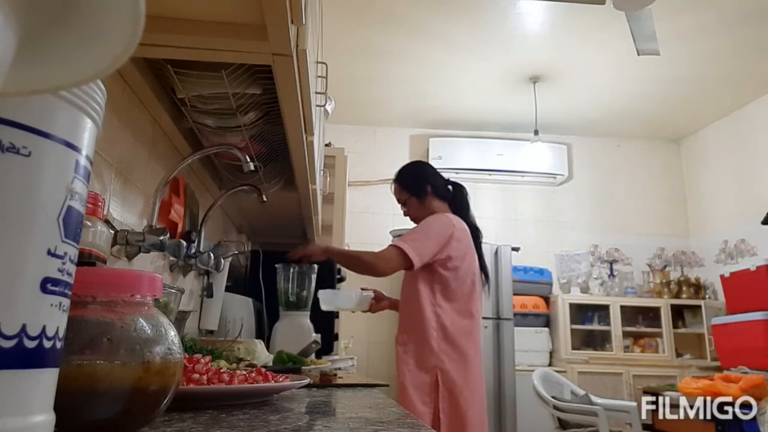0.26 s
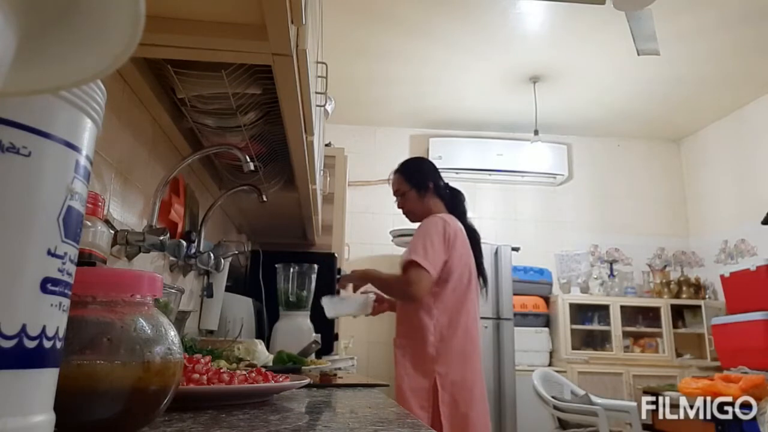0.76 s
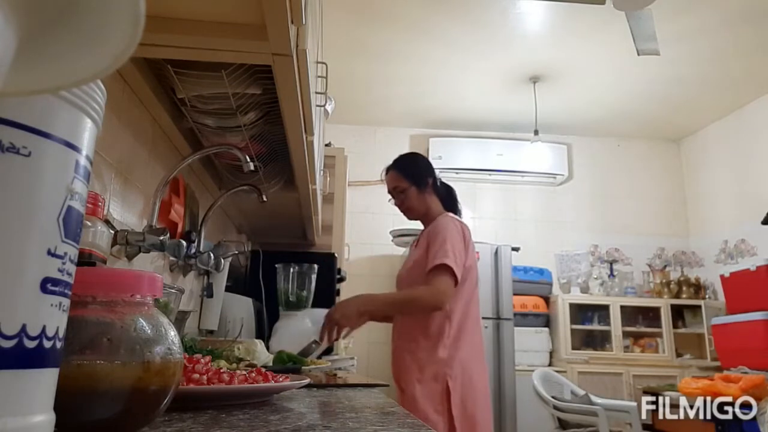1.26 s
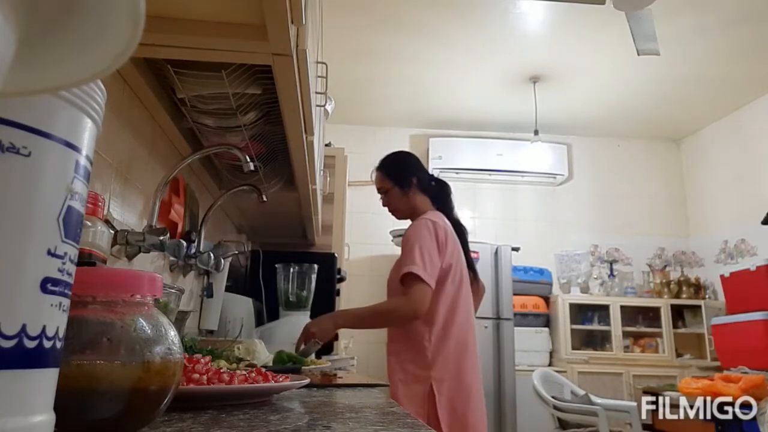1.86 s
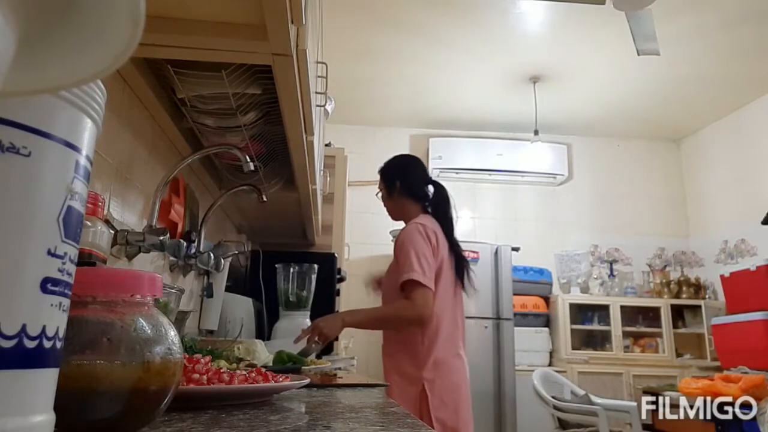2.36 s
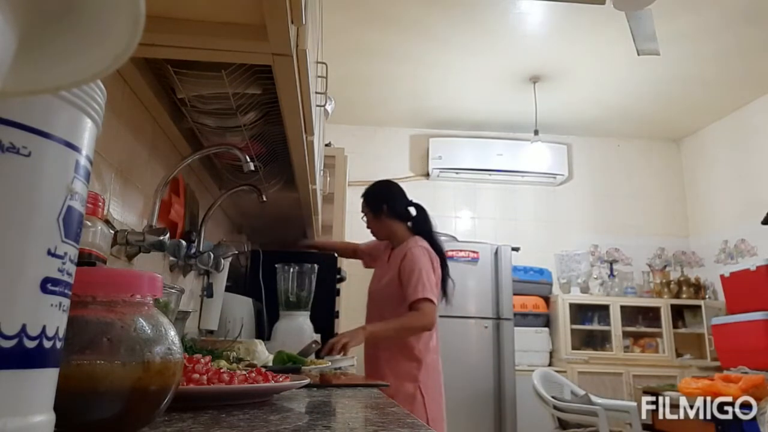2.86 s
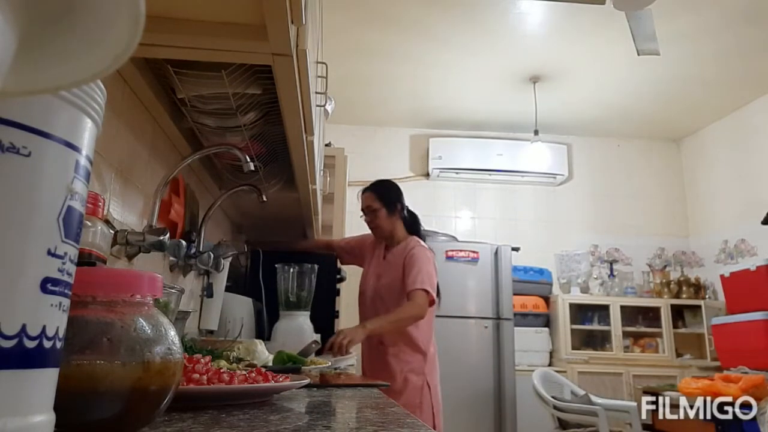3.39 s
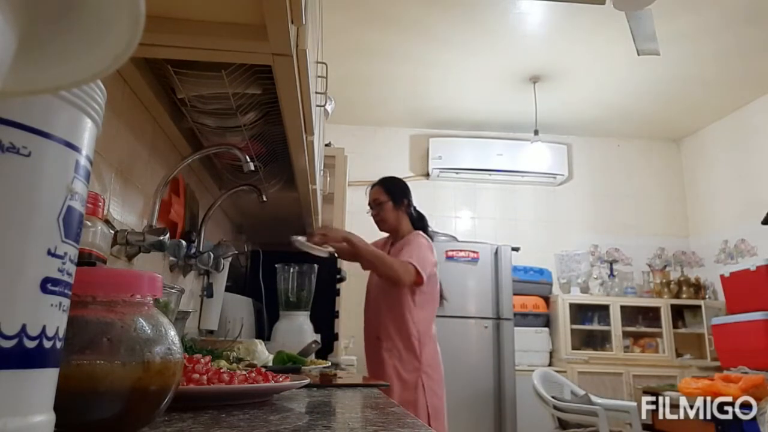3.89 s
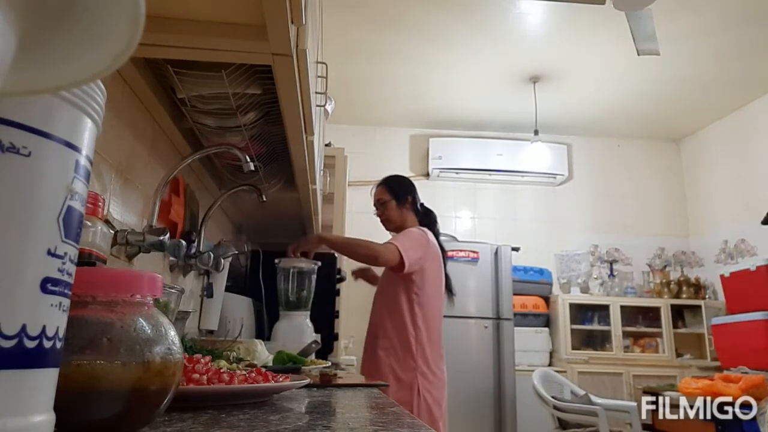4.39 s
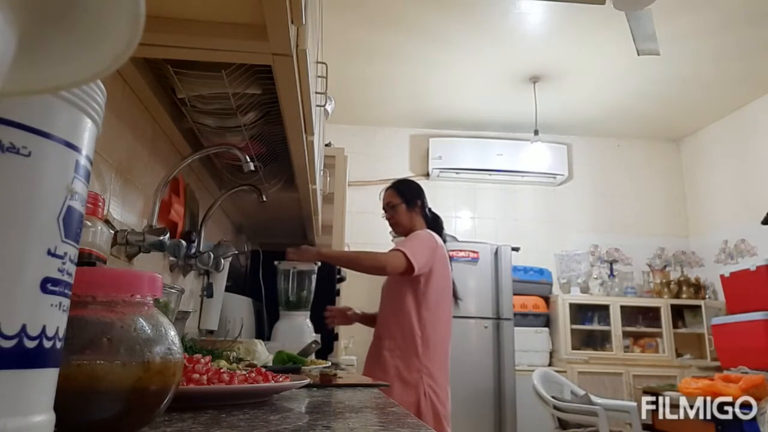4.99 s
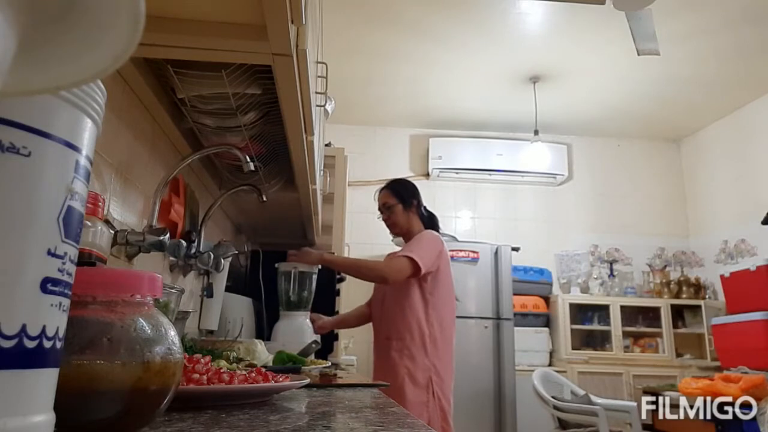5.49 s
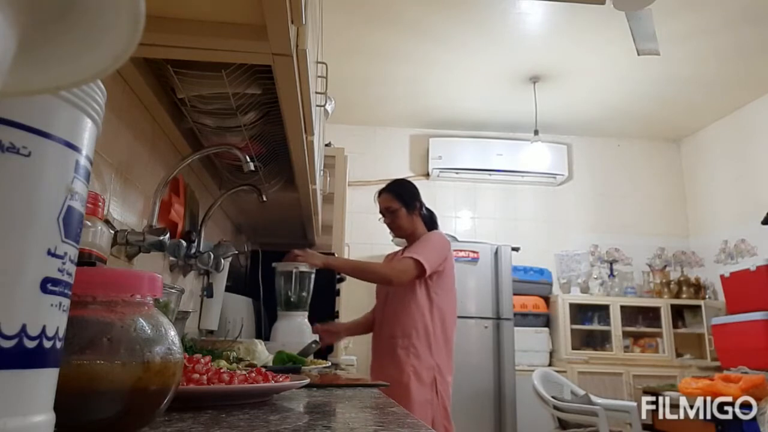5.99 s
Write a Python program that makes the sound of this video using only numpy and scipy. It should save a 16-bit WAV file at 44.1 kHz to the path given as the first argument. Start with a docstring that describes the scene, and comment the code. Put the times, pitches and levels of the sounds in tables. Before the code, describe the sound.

In a humming, echoing kitchen, a hollow plastic tub thuds and clatters on the counter, then a sharp snap, a lid clink and soft jar nudges.

```python
"""Fans run steadily in a hard-walled kitchen; then a plastic tub is knocked about on the counter and a cupboard.
Something snaps sharply, a lid clinks onto a blender jar, the jar is pressed and nudged on its base, and
something wooden is tapped. The blender motor stays off. Blows are noise bursts and ringing modes, the fans,
brushing and dragging are shaped noise. The two microphone ports hear every blow mostly through the room's echo."""
import sys
import numpy as np
from scipy import signal
from scipy.fft import rfft, irfft
from scipy.io import wavfile
from scipy.ndimage import uniform_filter1d

SR = 44100
rng = np.random.default_rng(int(sys.argv[2]) if len(sys.argv) > 2 else 0)


def to_wav(sig):
    """Store sig (one row per channel, or 1-D mono) as 16-bit WAV at the path in sys.argv[1].

    Samples outside -1..1 are clipped; the rate is SR.
    """
    pcm = np.clip(np.atleast_2d(sig), -1, 1) * 32767
    pcm = np.round(pcm).astype(np.int16)
    wavfile.write(sys.argv[1], SR, pcm.T)  # frames by channels


N = 275625  # samples, 6.25 s

# Fan noise spectrum. Each row: frequency [Hz], relative density [dB per Hz].
FAN_SPECTRUM = [(15, -53), (25, -36), (64, -1), (137, -2.5), (161, -14), (217, -14), (249, -15), (317, -10),
                (796, -15.5), (887, -22.5), (1160, -21.5), (3920, -43), (5430, -36), (6380, -49),
                (16000, -58.5)]
# Room resonances in the fan noise. Each row: frequency [Hz], width [Hz], lift before it is halved [dB].
AIR_RESONANCES = [(76, 4.6, 7), (120, 29.4, 1), (321.4, 33, 8.5), (395, 50, 6.5), (2320, 1000, 10.5),
                  (5400, 500, 6)]
FANS_DB, WAVER_DB = -43, 0.7   # fan level; spread of its slow wavering
# The fan blades sweep the lowest hum: rate, swing either way, time of a maximum.
THROB_HZ, THROB_DB, THROB_AT_S = 3.3, 3.5, 0.285

# How alike steady noise is at the two ports. Each row: frequency [Hz], likeness from -1 to 1 [no unit].
STEADY_LIKENESS = [(60, 1), (130, 0.94), (290, 0.92), (640, 0.51), (1410, -0.18), (3100, 0.15), (6820, 0.5),
                   (15000, 1)]
# How steady noise leans. Each row: frequency [Hz], left minus right [dB].
STEADY_LEAN = [(60, 0.5), (100, 2), (180, 3.5), (310, 0.5), (550, 5.5), (950, 4.5), (1650, 6.5),
               (2860, 6.5), (4970, 14), (8640, 2), (15000, -4.5)]
# How alike echoes are at the two ports. Each row: frequency [Hz], likeness from -1 to 1 [no unit].
ECHO_LIKENESS = [(60, 0.72), (130, 0.95), (290, 0.93), (640, 0.53), (1410, -0.42), (3100, -0.15),
                 (6820, 0.32), (15000, 1)]
# How echoes lean. Each row: frequency [Hz], left minus right [dB].
ECHO_LEAN = [(60, -6), (100, 7.5), (180, 0.5), (310, 0.5), (550, 3.5), (950, 0), (1650, 8.5), (2860, 1),
             (4970, 10), (8640, -1.5), (15000, -1)]
# Decay of the kitchen's echo. Each row: frequency [Hz], time to fall 60 dB [s].
ROOM_T60 = [(60, 0.4), (160, 0.49), (420, 0.45), (1100, 0.42), (2910, 0.46), (7680, 0.36)]
# Response of the microphone ports. Each row: frequency [Hz], gain [dB].
MIC_RESPONSE = [(300, 0), (1000, -2.5), (2500, 0.2), (3900, 4), (4600, -1), (5400, 0.2), (6200, -6),
                (7600, -3.5), (9500, -9), (12500, -8.5), (16000, -14)]
CUTOFF_HZ = 15800

# Cloth and hands brushing. Each row: time of peak [s], peak level [dB], rise [s], fall [s].
BRUSH_STROKES = [(.268, -66.5, .13, .19), (.63, -63, .1, .2), (.77, -65, .12, .2), (1.044, -73, 0.074, .2),
                 (1.53, -62, 0.062, 0.18), (2.1, -58, .1, .15), (4.45, -68, .02, 0.27),
                 (4.616, -55.5, 0.12, 0.16), (4.876, -59.5, .15, .09), (5.3, -54, .01, .03),
                 (5.506, -64, .3, 0.1), (5.605, -50, 0.0081, 0.084)]
# Brushing spectrum. Each row: frequency [Hz], relative density [dB per Hz].
BRUSH_SPECTRUM = [(1500, -5), (3000, 12), (5500, 6.5), (7500, 1.5), (16000, -14)]
BRUSH_SWING_DB = 17.5   # gained over the rise, lost over the fall
# Things dragged over the counter. Each row: time of stop [s], length [s], body level [dB], hiss level [dB],
# swell over the length, at least 3 in use [dB].
DRAGS = [(2.857, 0.071, -32.5, -40, 22), (2.938, .07, -27, -35, 14), (3.0, .06, -30, -35, 3),
         (5.148, 0.02, -35, -41, 37), (5.67, 0.058, -44.5, -47, 10)]
SLIDE_STOP_S = 0.013   # time to lose the swell again

# Blows, one table a thing. Each row: start [s], knock [dB], hollow body [dB], snap [dB], thump [dB], thump
# pitch [Hz]; all levels are relative.
TUB_BLOWS = [(1.783, -22.5, -22, -35, -38, 143), (1.796, -21, -17, -37, -21.5, 169),
             (1.891, -29.5, -36, -42, -31.5, 91), (2.002, -29.5, -23, -40, -37, 172),
             (2.202, -21.5, -29.5, -23, -10, 168), (2.213, -12, -10, -19, -7, 109.4),
             (2.254, -23, -18.5, -30, -13, 100.5), (2.412, -23, -17.5, -26, -18, 162),
             (2.433, -21, -19, -34, -10.5, 118), (2.468, -54, -35, -43, -29, 106),
             (2.86, -44, -31.5, -40, -22, 101), (2.903, -37, -33.5, -55, -22, 122),
             (2.936, -23, -13.5, -28, -15, 99), (2.965, -24, -40, -32, -20, 84.5),
             (2.987, -26, -19, -34, -12.5, 144), (3.028, -32, -39, -38, -21.5, 174.3),
             (3.289, -36, -32, -46, -24, 101), (3.379, -56, -56, -46, -64, 106)]
# The sharp snap. Each row: columns as for the tub [s, dB, dB, dB, dB, Hz].
SNAP_BLOWS = [(3.452, -28.5, -44.5, -15, -35, 120)]
# The lid clinking on. Each row: columns as for the tub [s, dB, dB, dB, dB, Hz].
LID_BLOWS = [(4.143, -28, -39, -32.5, -31, 120), (4.182, -37.5, -34.5, -49, -50, 120)]
# The jar pressed and nudged. Each row: columns as for the tub [s, dB, dB, dB, dB, Hz].
JAR_BLOWS = [(4.101, -36, -49, -45.5, -52, 120), (4.39, -45, -36, -45.5, -33, 146.5),
             (4.432, -44.5, -43, -44, -39, 108), (5.081, -53, -52, -57, -54, 140),
             (5.156, -36, -36, -24, -34, 126), (5.162, -40, -26, -36, -17, 122),
             (5.197, -39, -28, -62, -25, 117), (5.256, -46, -29.5, -60, -28, 117),
             (5.295, -45, -44, -58, -29, 138), (5.67, -49, -61, -38, -32, 126),
             (5.68, -47, -30, -55, -47, 120)]
# The wooden taps. Each row: columns as for the tub [s, dB, dB, dB, dB, Hz].
TAP_BLOWS = [(6.023, -46, -36.5, -42.5, -39, 120), (6.061, -48, -46, -51, -47, 120),
             (6.166, -43, -51, -67, -49, 120)]

# What rings in the counter. Each row: frequency [Hz], relative level [dB], time to fall 60 dB [s].
COUNTER_MODES = [(92.2, -11.5, 0.48), (120, -7.5, 0.17)]
# What rings in the plastic tub. Each row: frequency [Hz], relative level [dB], time to fall 60 dB [s].
TUB_MODES = [(313, 3, 0.033), (388, -8, 0.05), (594, 5.5, 0.049), (646, -18, 0.12), (768, -1, 0.061),
             (1189.5, -1, 0.04), (1520, 2.5, 0.015), (1997, 9.5, 0.02)]
# What rings in the lid. Each row: frequency [Hz], relative level [dB], time to fall 60 dB [s].
LID_MODES = [(374, 5, 0.42), (588, -7.5, 0.3), (957, 9, 1.0), (962, 1, 1.0), (1070, 7, 0.22),
             (1117, -5, 0.16), (1650, 6.5, 0.16), (2000, 2.5, 0.22), (2590, 2, 0.24), (3890, -1, 0.12)]
# What rings in the jar and in the snap. Each row: frequency [Hz], relative level [dB], time to fall 60 dB [s].
JAR_MODES = [(635, -23, 0.051), (1101, 3, 0.09), (2030, 0.5, 0.037), (3670, 11.5, 0.025)]
# What rings in the tapped wood. Each row: frequency [Hz], relative level [dB], time to fall 60 dB [s].
TAP_MODES = [(507, 5, 0.12), (680, -13, 0.049)]

# Centres of the contact's bands in one list: body, knock, crack, snap, sizzle [Hz].
CONTACT_HZ = [420, 1200, 3000, 6000, 11000]
# How each thing makes contact. Each row, by thing: decay time when snap equals knock [ms], ringing [dB],
# crack against the mean of knock and snap [dB], sizzle against snap [dB],
# spread of each mode's strength from blow to blow [dB].
CONTACT = {"tub": (4.6, -23.5, -6, -5.5, 1.8), "snap": (1.3, -44, -7, -2.5, 6),
           "lid": (3.0, -10.5, -4.5, -21.5, 0.8), "jar": (3.5, -18.5, -1.5, -9, 1.5),
           "tap": (2.5, -15, -10.5, -15, 1.5)}
HARDNESS = 0.26   # brighter blows are shorter: dB of contact length lost per dB of snap over knock


def amp(db):
    """Decibels to a linear gain."""
    return 10 ** (np.asarray(db) / 20)


def unit_energy(x):
    """Scale to a summed square of 1."""
    return x / np.sqrt(np.sum(x ** 2) + 1e-20)


def at_hz(points, hz):
    """Read a table on a log-frequency axis."""
    table = np.array(points)
    return np.interp(np.log(hz + 0.0011), np.log(table[:, 0]), table[:, 1])


def band(x, low_hz, high_hz):
    """Keep the sound between two frequencies."""
    return signal.sosfilt(signal.butter(2, [low_hz, high_hz], "band", fs=SR, output="sos"), x)


def drift(rate_hz):
    """Slow chance, spread 1: noise smoothed by two equal poles, drawn every 40 samples."""
    r = np.exp(-80 * np.pi * rate_hz / SR)
    chance = rng.standard_normal(N // 40 + 2002)
    slow = signal.lfilter([1], [1, -2 * r, r * r], chance)[2000:]   # the start has settled
    return np.interp(np.arange(N) / 40, np.arange(len(slow)), slow / slow.std())


def swell(peak_s, peak_db, rise_s, fall_s, swing_db):
    """Gain that climbs evenly in dB to its peak and falls again; silent before the rise."""
    since = np.arange(N) / SR - peak_s
    away = np.where(since < 0, -since / max(rise_s, .002), since / max(fall_s, .002))
    return amp(peak_db - swing_db * away) * (since > -rise_s)


def stereo_noise(size, colour, likeness, lean):
    """Diffuse noise at the two ports: likeness and lean vary with frequency; overall rms 1."""
    hz = np.fft.rfftfreq(size, 1 / SR)
    mid, side = rfft(rng.standard_normal((2, size)))
    alike = np.clip(at_hz(likeness, hz), -1, 1)
    sign = np.array([[1], [-1]])
    pair = np.sqrt(1 + alike) * mid + np.sqrt(1 - alike) * side * sign
    out = irfft(pair * colour(hz) * amp(sign * at_hz(lean, hz) / 2), size)
    return out / out.std()


def fans():
    """Steady air noise coloured by room resonances; its bass throbs with the blades."""
    def colour(hz):
        humps = 0
        for top_hz, width_hz, lift_db in AIR_RESONANCES:
            humps = humps + (amp(lift_db) - 1) / (1 + (2 * (hz - top_hz) / width_hz) ** 2)
        return amp(at_hz(FAN_SPECTRUM, hz)) * (1 + .5 * humps)

    air = stereo_noise(N, colour, STEADY_LIKENESS, STEADY_LEAN)
    hum = band(air, 53, 96)
    sweep = np.cos(2 * np.pi * THROB_HZ * (np.arange(N) / SR - THROB_AT_S))
    throb = hum * (amp(THROB_DB * sweep) - 1)
    return amp(FANS_DB) * (air * amp(WAVER_DB * drift(1.4)) + throb)


def kitchen(x, direct_db, early_db):
    """The direct sound, strong echoes off near tiles, then a tail that dies octave by octave."""
    t = np.arange(2 ** 15) / SR
    noise = stereo_noise(len(t), np.ones_like, ECHO_LIKENESS, ECHO_LEAN)
    echo = 0
    for low in 60 * 2. ** np.arange(8):
        high = 2 * low if low < 7000 else 18000
        decay = amp(-60 * t / at_hz(ROOM_T60, 1.26 * low))
        echo = echo + band(noise, low, high) * decay
    onset = 1 - np.exp(-t / 0.0013)
    near_tiles = 1 + amp(early_db) * np.exp(-t / 0.0049)
    echo = unit_energy(echo * onset * near_tiles) * np.sqrt(2)
    # the sources stand to the left: louder there, five samples later on the right
    echo[0, 0] += amp(direct_db + 6.0)
    echo[1, 5] += amp(direct_db - 2.0)
    return signal.fftconvolve(x[None], echo, axes=1)[:, :N]


def microphone_ports(x):
    """The microphone ports lift the presence range."""
    return irfft(rfft(x) * amp(at_hz(MIC_RESPONSE, np.fft.rfftfreq(N, 1 / SR))), N)


def brushing():
    """Cloth and hands: faint bright friction, patchy, each stroke swelling and fading."""
    hiss = stereo_noise(N, lambda hz: amp(at_hz(BRUSH_SPECTRUM, hz)), STEADY_LIKENESS, STEADY_LEAN)
    strokes = sum(swell(*row, BRUSH_SWING_DB) for row in BRUSH_STROKES)
    return strokes * amp(1.0 * drift(25)) * hiss


def slides():
    """Dragging over the counter: a rumbling body and a hiss, both uneven, louder until they stop."""
    def colour(hz):
        return amp(at_hz(MIC_RESPONSE, hz)) / np.sqrt(hz + 300)

    rub = stereo_noise(N, colour, ECHO_LIKENESS, ECHO_LEAN)
    body, hiss = band(rub, 270, 1680), band(rub, 2350, 21000)
    out = 0
    for stop_s, length_s, body_db, hiss_db, swell_db in DRAGS:
        sound = amp(body_db) * body / body.std() + amp(hiss_db) * hiss / hiss.std()
        out = out + swell(stop_s, 0, length_s, SLIDE_STOP_S, max(swell_db, 3)) * sound
    return amp(1.6 * drift(50)) * out


def ring(force, modes):
    """A force sets every mode of a body ringing: one damped resonator a mode."""
    out = 0
    for hz, level_db, t60 in modes:
        r = amp(-60 / (max(t60, .01) * SR))
        w = 2 * np.pi * hz / SR
        poles = [1, -2 * r * np.cos(w), r * r]
        out = out + signal.lfilter([0, amp(level_db) * np.sin(w)], poles, force + 1e-18)
    return out


def counter_thump(t, thump_hz):
    """A soft push sets the counter's panels ringing; the deepest bass is cut away steeply."""
    push = np.exp(-t / 0.0004) * t
    panel = ring(push, COUNTER_MODES + [(thump_hz, 2.5, .13)])
    panel = signal.sosfilt(signal.butter(4, 70, "high", fs=SR, output="sos"), panel)
    return panel / np.abs(panel).max()


def blows(events, modes, contact):
    """Each blow: a soft push into the counter, a gritty contact, and the ringing of the struck body."""
    thump, knock, rung = np.zeros((3, N + SR))
    size, lead = 32768, 128   # samples
    t, hz = np.arange(size) / SR, np.fft.rfftfreq(size, 1 / SR)
    late = np.exp(-2j * np.pi * hz * lead / SR)   # room for the rise of the contact
    impulse = 1. * (t == 0)
    partials = np.array([ring(impulse, [mode]) for mode in modes]) * (t < size / SR / 2 - .01)
    partials = rfft(partials / np.sqrt(np.sum(partials.sum(axis=0) ** 2)))
    length_ms, ring_db, crack_db, sizzle_db, spread_db = contact
    for start_s, knock_db, body_db, snap_db, thump_db, thump_hz in events:
        contact_ms = np.clip(length_ms * amp(-HARDNESS * (snap_db - knock_db)), .3, 12)
        through = 1000 * t / contact_ms
        body = amp(spread_db * rng.standard_normal(len(modes))) @ partials
        envelope = np.exp(-through) * (1 - np.exp(-7 * through))   # long contacts start softly
        grit = rfft(rng.standard_normal(size) * envelope)
        grit = grit / np.sqrt(uniform_filter1d(np.abs(grit) ** 2, size=50))   # grit has no colour of its own

        crack_level = (knock_db + snap_db) / 2 + crack_db
        levels = [body_db, knock_db, crack_level, snap_db, snap_db + sizzle_db]
        points = [(60, body_db - 25), (170, body_db - 6.5), *zip(CONTACT_HZ, levels)]
        # band level spread over its width
        colour = amp(at_hz(points, hz) + 28.5) * np.sqrt(SR / 2 / (hz + 50)) * late

        start = round(start_s * SR)
        at = start - lead
        knock[at:at + size // 8] += irfft(grit * colour)[:size // 8]
        rung[at:at + size // 2] += amp(ring_db) * irfft(body * colour)[:size // 2]
        thump[start:start + size // 2] += amp(thump_db) * counter_thump(t[:size // 2], thump_hz)
    return thump[:N], knock[:N], rung[:N]


def struck(events, modes, contact, direct_db, early_db, left_db):
    """Blows and their echo at the ports; the lean raises the left and lowers the right by left_db."""
    thump, knock, rung = blows(events, modes, contact)
    into_room = microphone_ports(knock) + amp(-12.0) * thump + amp(2.0) * rung
    heard = kitchen(into_room, direct_db, early_db)
    return thump * amp([[.9], [-.9]]) + (heard + rung) * amp([[left_db], [-left_db]])


def wooden_tap():
    """Something wooden is tapped: short contacts and two modes."""
    return struck(TAP_BLOWS, TAP_MODES, CONTACT["tap"], direct_db=-8, early_db=3, left_db=.3)


def snap():
    """A sharp snap: a very short, bright contact with hardly any ringing."""
    return struck(SNAP_BLOWS, JAR_MODES, CONTACT["snap"], direct_db=-9, early_db=3, left_db=1.5)


def lid():
    """A lid clinks onto the jar: its lightly damped modes ring on."""
    return struck(LID_BLOWS, LID_MODES, CONTACT["lid"], direct_db=-9, early_db=1.5, left_db=.3)


def jar():
    """The jar is pressed and nudged on its base: gentle contacts and quickly damped modes."""
    return struck(JAR_BLOWS, JAR_MODES, CONTACT["jar"], direct_db=-8, early_db=3, left_db=.3)


def tub():
    """A plastic tub is knocked about: hollow, short-lived modes over thumps in the counter."""
    return struck(TUB_BLOWS, TUB_MODES, CONTACT["tub"], direct_db=-13, early_db=-3, left_db=.1)


def scene():
    """The fans and friction behind, the struck things in front."""
    background = fans() + brushing() + slides()
    return background + wooden_tap() + snap() + lid() + jar() + tub()


def record(dry):
    """The highest peaks are rounded, the top is cut steeply."""
    rounded = 1.3 * np.tanh(dry / 1.3)
    return signal.sosfilt(signal.ellip(12, .5, 75, CUTOFF_HZ, fs=SR, output="sos"), rounded)


dry = scene()
out = record(dry)
to_wav(out)
```